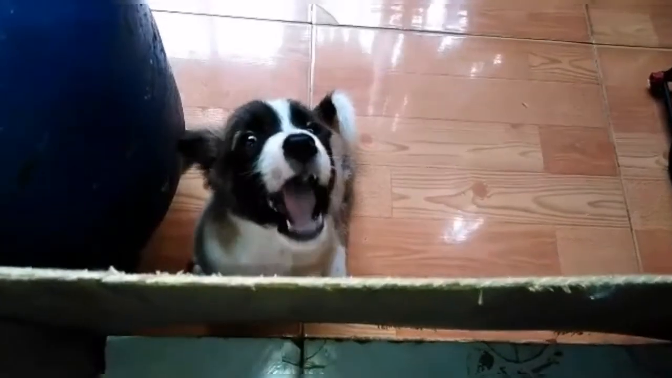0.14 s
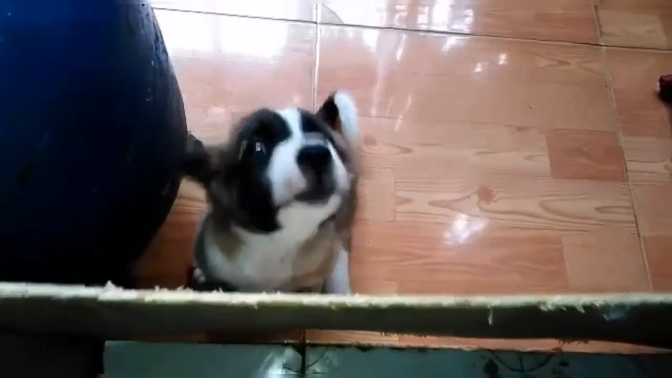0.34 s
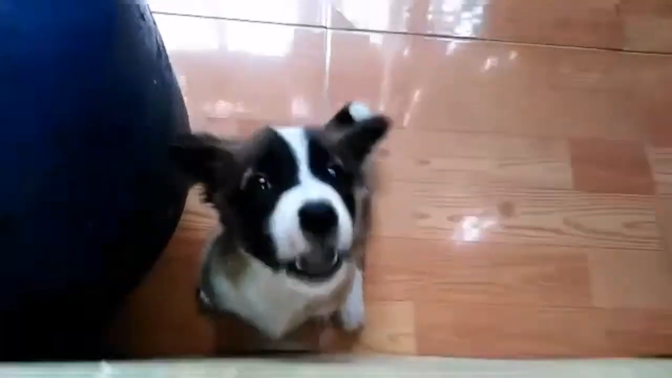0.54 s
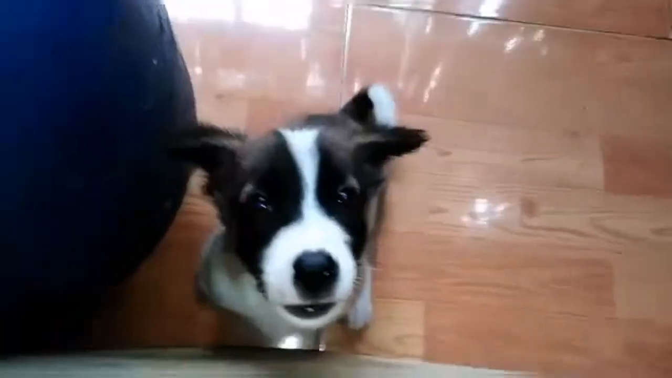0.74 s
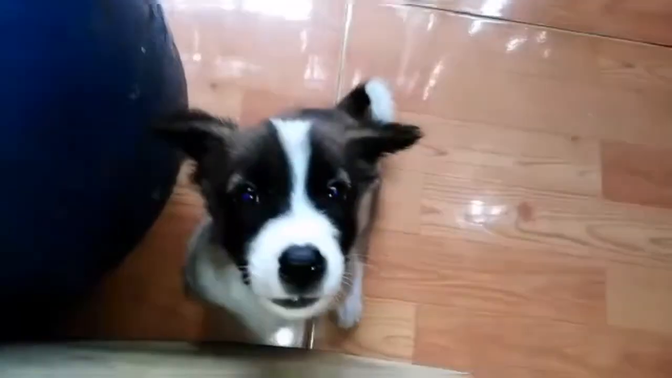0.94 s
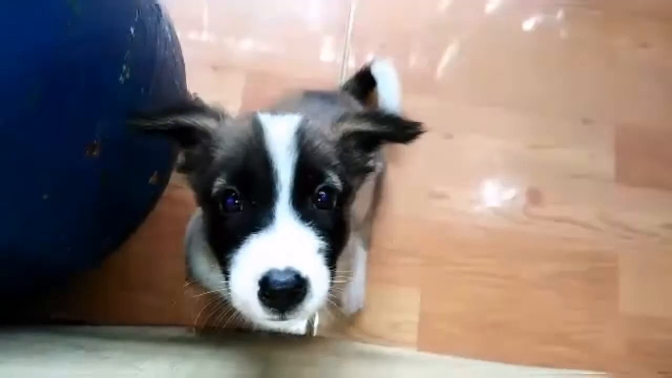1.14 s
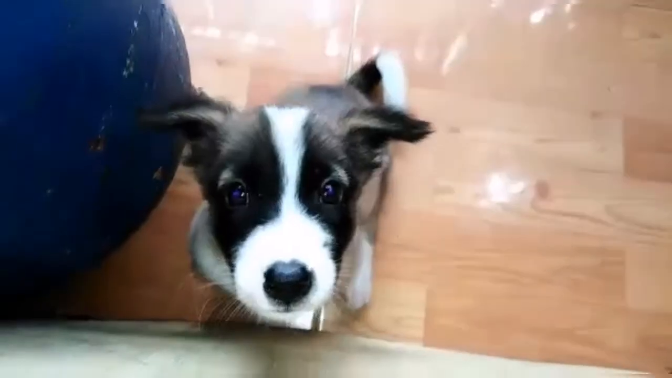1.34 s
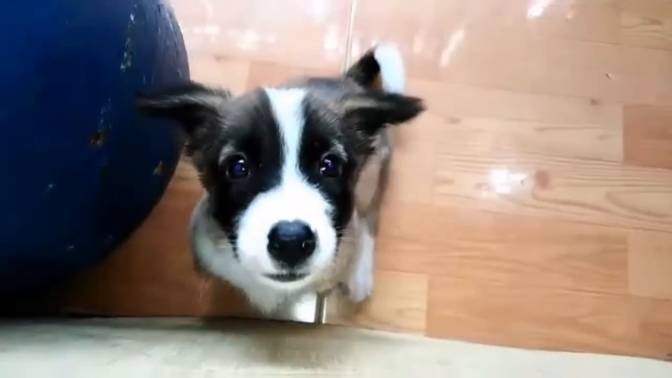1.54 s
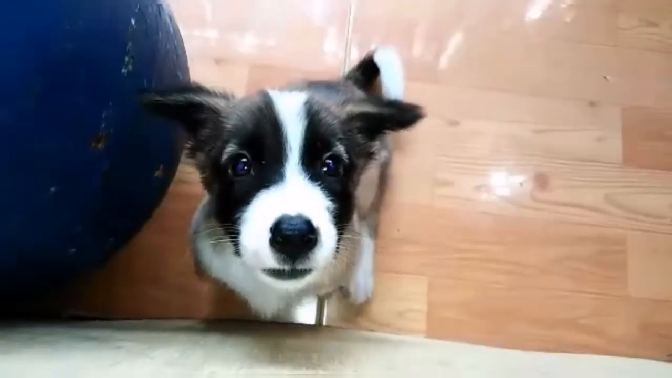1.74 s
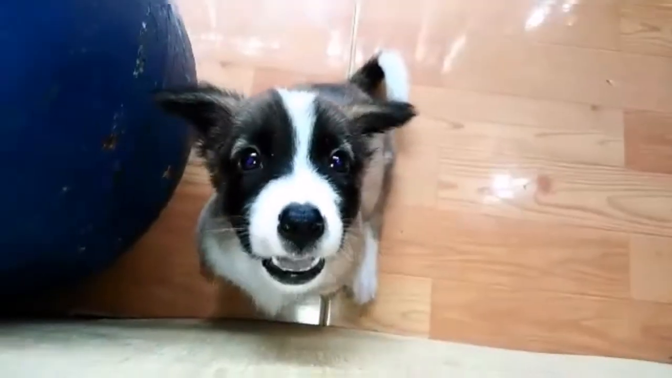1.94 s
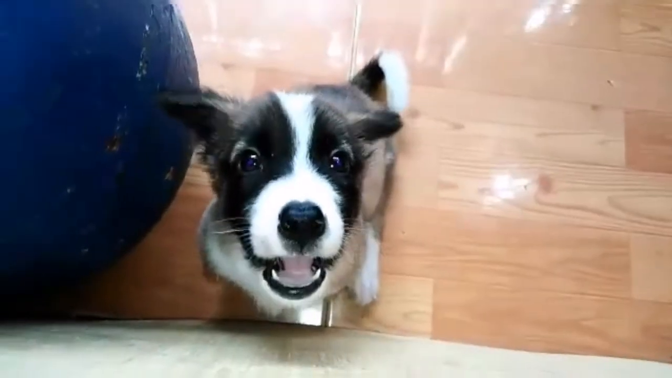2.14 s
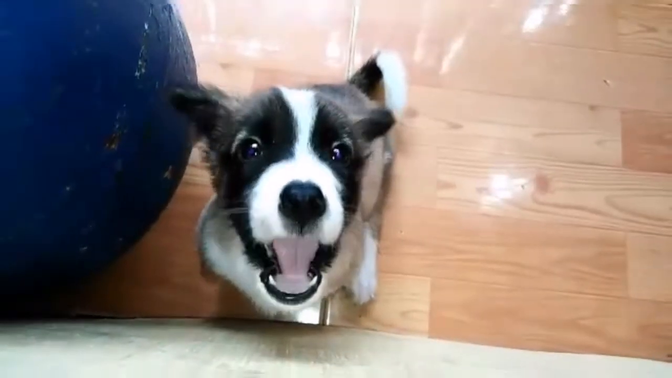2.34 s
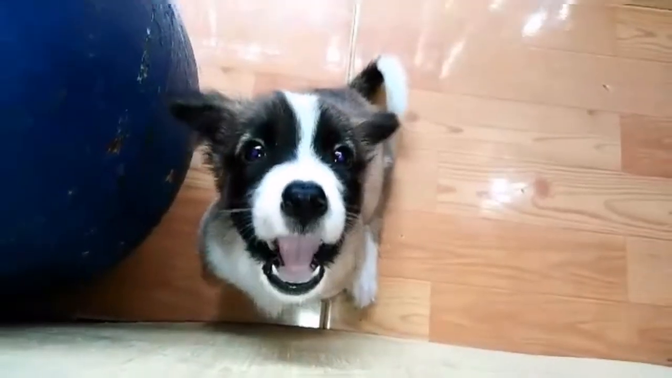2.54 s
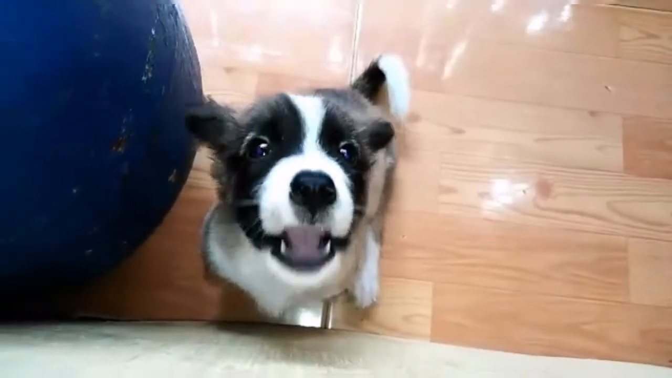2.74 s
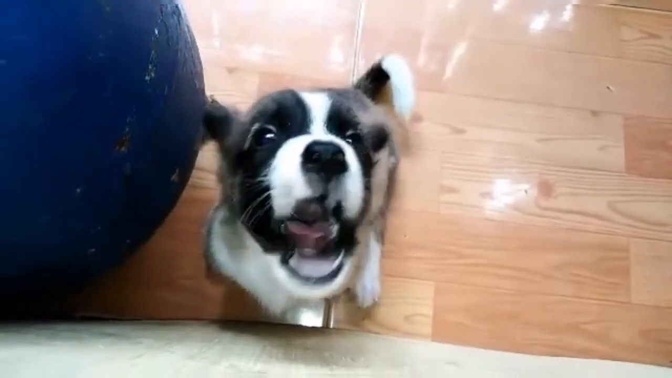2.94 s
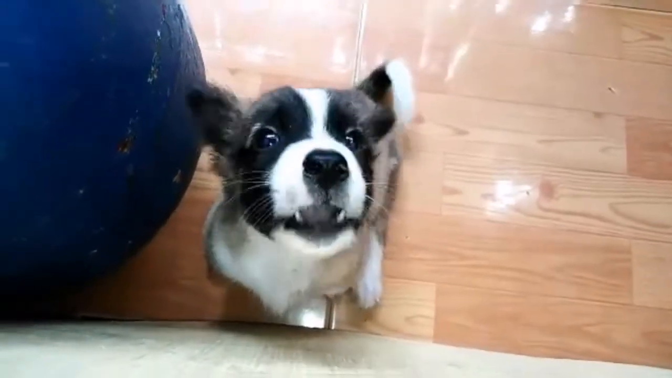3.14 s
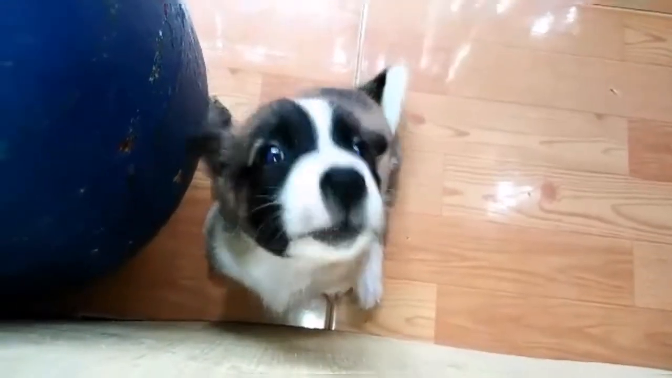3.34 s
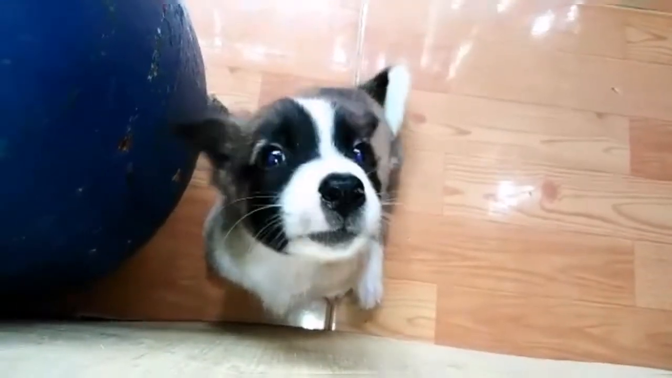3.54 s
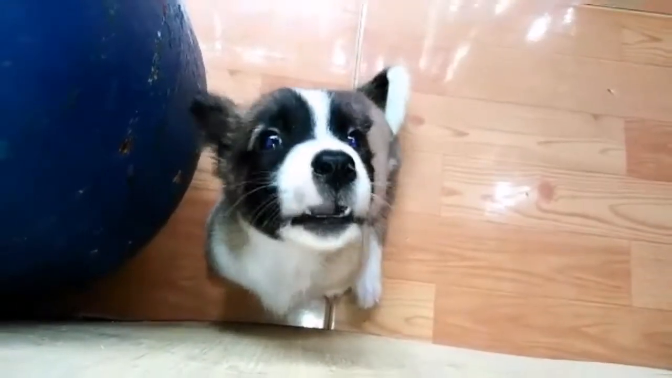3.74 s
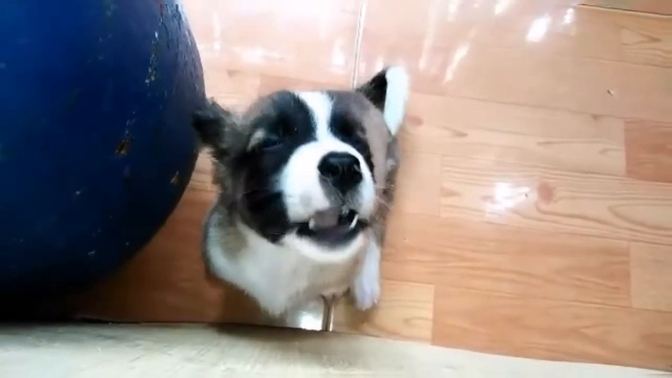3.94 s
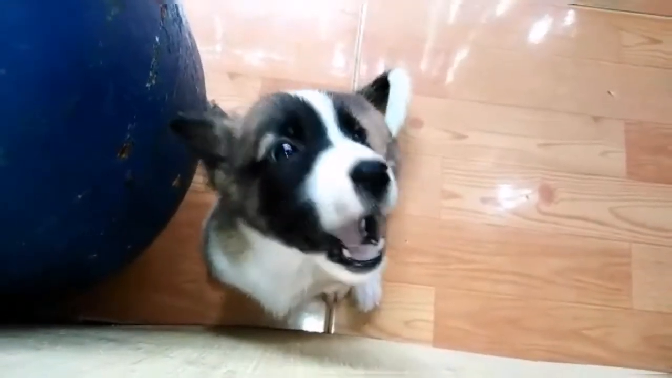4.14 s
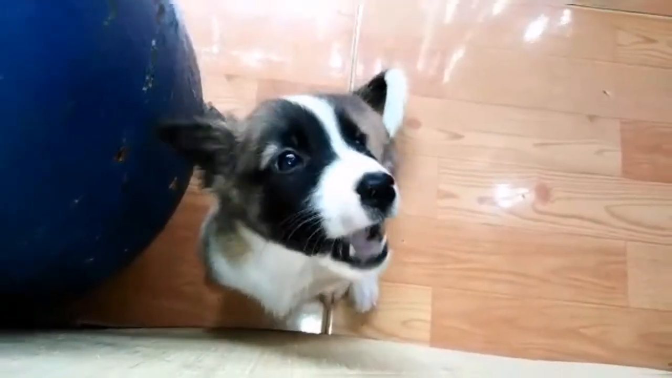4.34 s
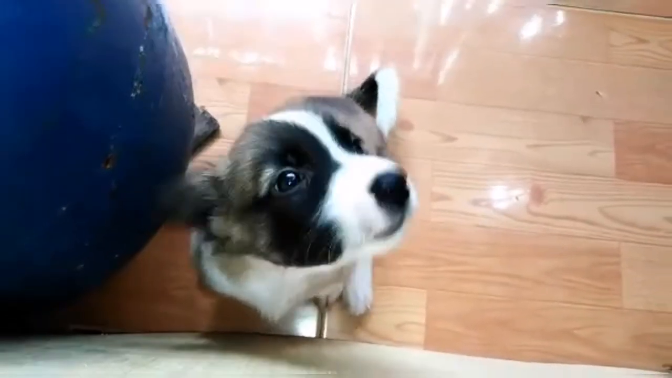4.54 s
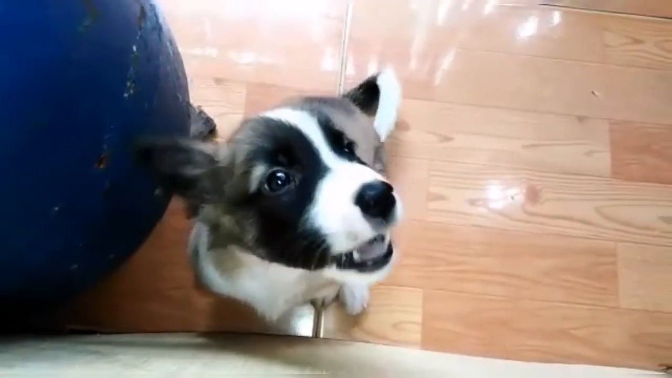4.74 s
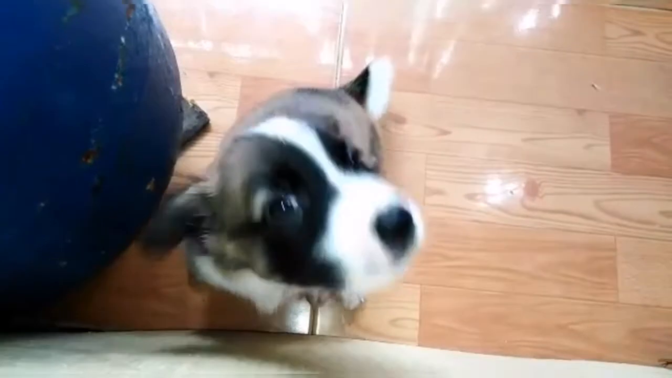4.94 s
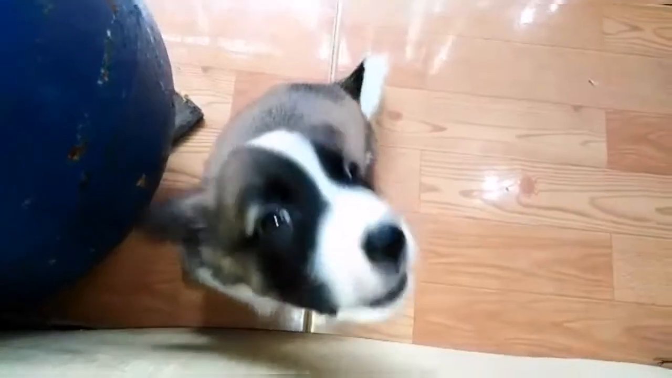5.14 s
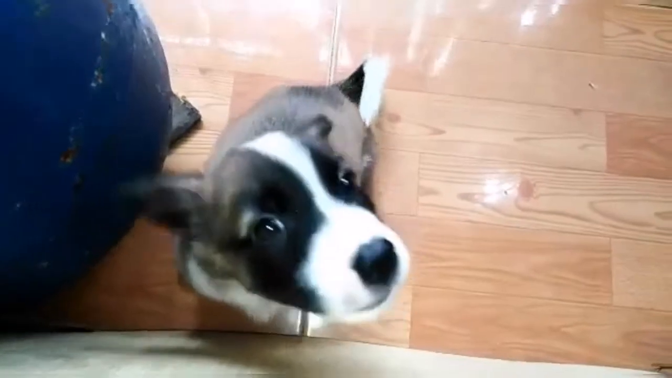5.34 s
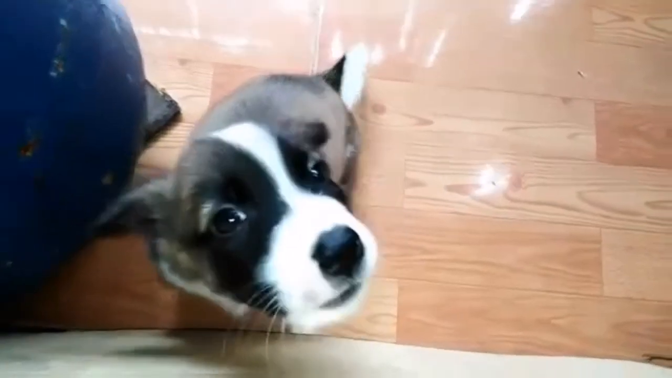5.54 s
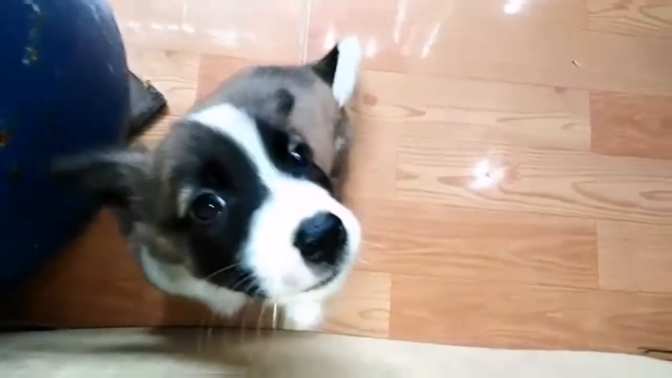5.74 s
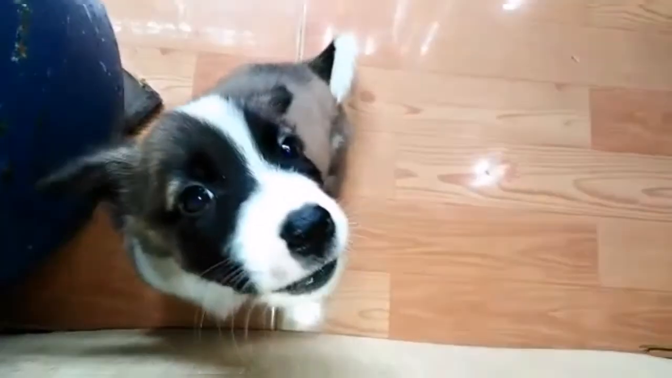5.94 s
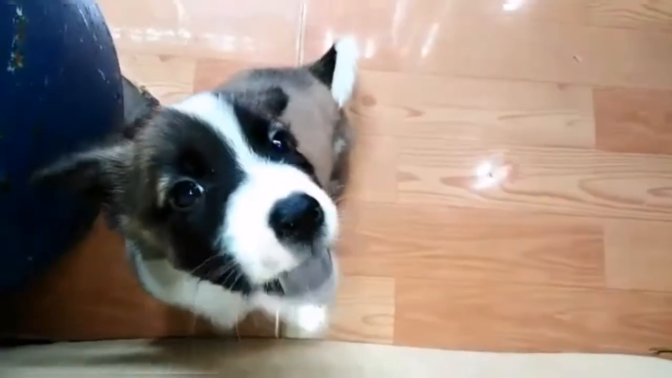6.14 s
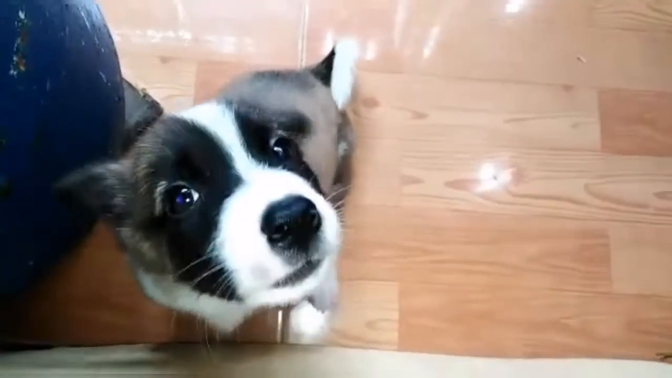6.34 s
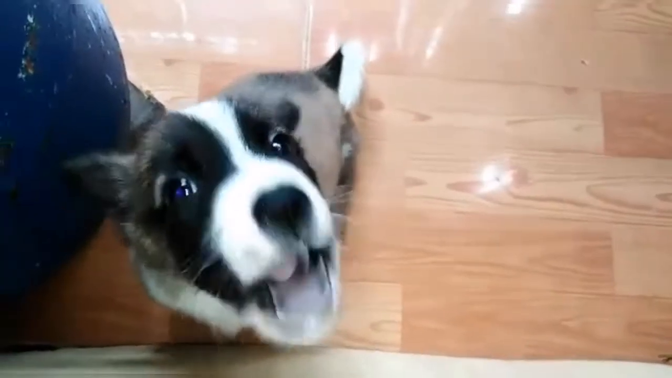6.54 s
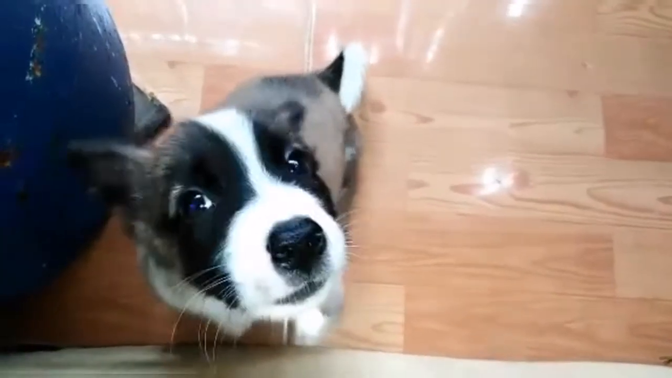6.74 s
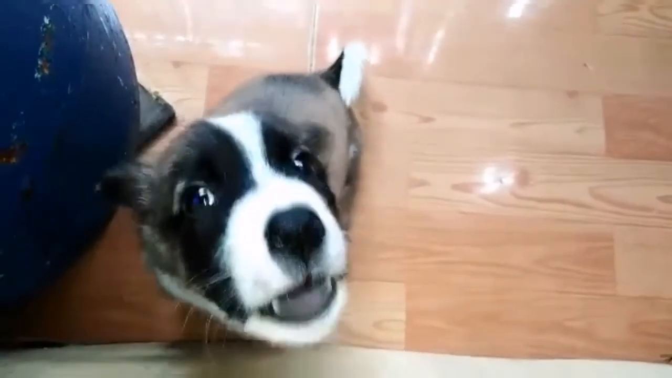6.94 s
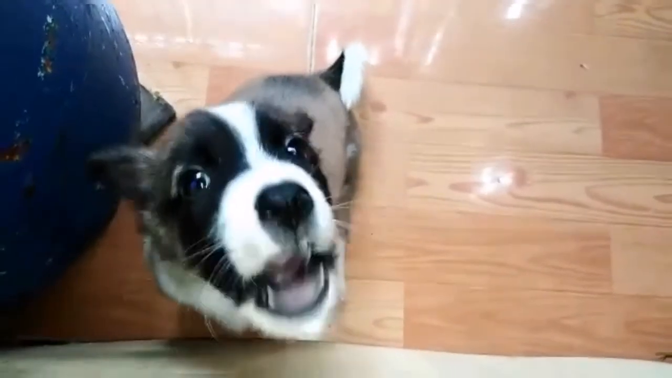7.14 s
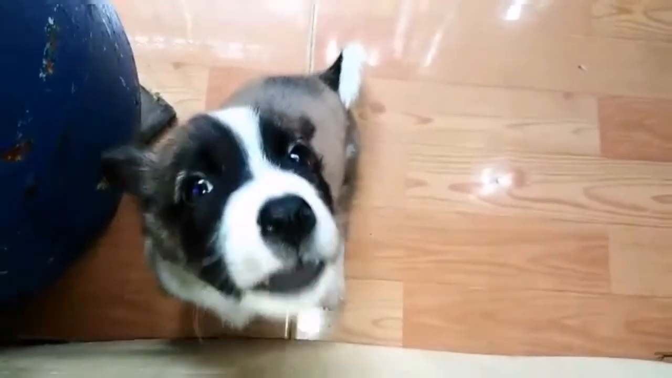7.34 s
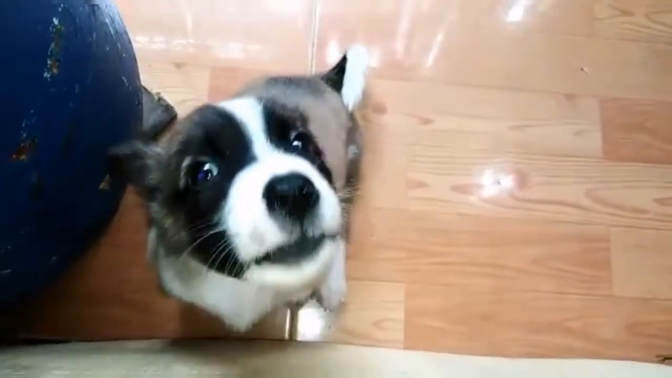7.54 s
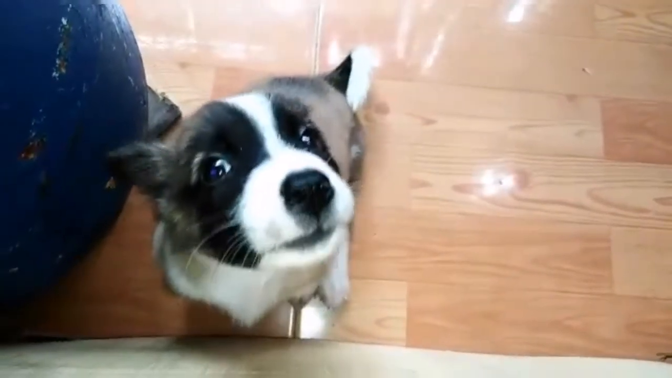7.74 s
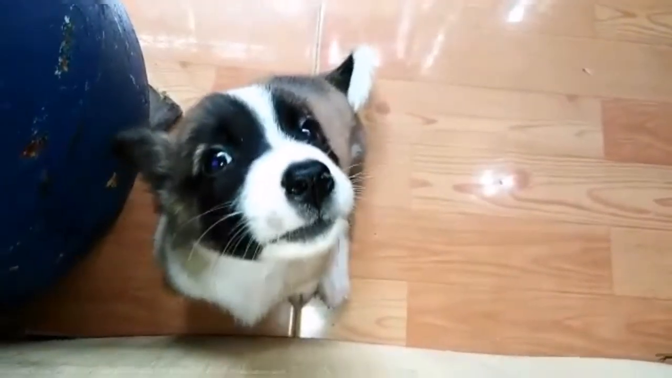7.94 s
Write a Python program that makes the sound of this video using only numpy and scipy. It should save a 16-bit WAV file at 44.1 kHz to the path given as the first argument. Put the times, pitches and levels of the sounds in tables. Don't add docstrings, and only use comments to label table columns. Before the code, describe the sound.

Low room rumble with a faint motor hum; the tail of a yelp is cut off at the very start. At 0.1 s a puppy gives a loud, high, raspy bark close to the microphone, then a squeaky short yelp at 0.5 s. Around 0.6-0.8 s dull bumps on low boards mix with a short metallic gate rattle. From 0.9 to 1.7 s there is a lull: rumble, light taps at 1.2-1.5 s, a tiny thin squeak. Small yelps at 1.75 and 2.0 s grow louder at 2.25 and 2.5 s, leading to full barks at 2.85 and 3.2 s. A weak yelp and bump come at 3.6 s, then sharp barks roughly every 0.35 s from 3.8 to 7.2 s, with a slightly longer gap near 5.8 s. Two shorter yelps close at 7.6 and 7.9 s. Short tiled-room echo, overloaded peaks, rumble ducking under barks.

```python
import sys
import numpy as np
from scipy import signal
from scipy.fft import rfft, irfft, next_fast_len
from scipy.io import wavfile
from scipy.ndimage import uniform_filter1d

SR = 44100
rng = np.random.default_rng(int(sys.argv[2]) if len(sys.argv) > 2 else 0)


def inscribe(sig):
    pcm = np.round(np.clip(np.atleast_2d(sig).T, -1, 1) * 32767)
    wavfile.write(sys.argv[1], SR, pcm.astype(np.int16))


def makeup_ratio(level_db):
    decades = np.asarray(level_db, float) / 20
    return 10 ** decades


N = 352789

# f/Hz, level/dB per Hz
ROOM_TONE = [(18, -48), (30, 5.5), (137, 0), (428, -21.5), (568, -14.5), (858, -23), (1510, -26.5),
             (1680, -22.5), (5490, -25.5), (8970, -27), (14300, -37)]
# f/Hz, level/dB
MOTOR_HUM = [(61, -46.5), (125, -47.5)]
# t/s, level/dB
RUMBLE_SWELL = [(0, -46.5), (.8, -39), (1.7, -46.5), (2.7, -35.5), (3.6, -40.5), (4.5, -41.5), (5.5, -44),
                (6.3, -44), (7.1, -34), (8, -50.5)]
# f/Hz, level/dB
MOUTH = [(250, -5), (500, -1), (900, -12), (1400, 10.5), (2100, -1), (2600, -7), (3300, 8.5), (4300, -6),
         (5500, -7.5), (6300, -24.5), (8000, -28)]
# start t/s, peak level/dB, opening f/Hz, crest f/Hz, closing f/Hz
YELP_EVENTS = [(-.06, -29.5, 858, 856, 740), (0.535, -17, 752, 764.5, 720),
               (1.742, -18.5, 637, 672.5, 661.3), (1.985, -18, 602, 792, 750),
               (2.267, -9.5, 804, 891, 798.4), (2.532, -6.5, 708.5, 916, 787),
               (2.665, -15, 1012, 1001, 797), (3.613, -23, 598, 639, 587), (5.845, -20, 609, 674, 678),
               (7.594, -18, 720, 764.5, 572), (7.91, -17, 758, 806, 654)]
# crest t/s, end t/s, period doubling/0-1, chaos/0-1, jaw gape/factor
YELP_TIMING = [(0.026, .1, .2, 1, 1.15), (0.048, 0.084, 0.2, 0.23, 1.15), (.014, .068, .05, .03, 1.04),
               (.045, .125, .05, .03, 1.21), (.032, .13, .02, .03, 1.38), (.05, .13, .55, .1, 1.24),
               (0.0069, .045, .1, 0.2, 1.73), (0.043, 0.039, 0.44, 0.94, 1.04),
               (0.0217, 0.056, 0.36, 0.5, 1), (.026, .11, 0.3, 0.34, 1.11), (0.0355, .1, 0.08, 0.18, 0.9)]
# brightness offset/dB per octave, upper mouth resonance/factor,
# level offset of the fall/dB, share of the pitch drop made early/0-1
YELP_COLOUR = [(1.5, 1.03, -13, 0.408), (-2.5, 1.274, -6, 0.435), (-5.5, 1.05, 13, 0.47),
               (0.0, 1.023, 1, 0.85), (-3, 1.22, -9, 0.64), (1, 1.073, -1, .7), (1.5, 1.0, 12, 0.388),
               (-6.5, 1.084, 2, .4), (-20, 1.04, 13, 0.37), (0.0, 1.2, 11, 0.63), (-3, 1.03, 14, 0.056)]
# level from peak/dB, share of doubling/0-1, added chaos/0-1, brightness/dB per octave
YELP_STEPS = [
    (-2, 0.9, 0.71, -5.5),
    (-1, 0.65, 0.14, 6),
    (1.5, 1.0, 0.0, 4),
    (1.5, 0, 0.0, 9),
    (-8, 0, 0.56, 12),
]
# start t/s, peak level/dB, crest f/Hz, closing f/Hz, jaw gape/factor
BARK_EVENTS = [(0.103, -5, 960, 612, 1.03), (2.855, -5, 941, 581.5, 0.92), (3.23, -5.5, 932.7, 562, 0.98),
               (3.835, -8.5, 805, 606, 0.98), (4.124, -7, 847, 647, 1.06), (4.4, -6, 968.4, 590, 0.92),
               (4.742, -5, 960, 570, 0.93), (5.075, -6.5, 976, 563, 0.92), (5.45, -5.5, 955, 524, 0.9),
               (6.126, -4, 952, 589, 0.93), (6.48, -4, 958.5, 552, 0.93), (6.853, -3.5, 926, 497, 0.93),
               (7.209, -5.5, 895.6, 628, 0.93)]
# folds lock t/s, doubling clears t/s, pitch sags t/s, end t/s,
# period doubling/0-1
BARK_TIMING = [(.08, 0.082, .12, .21, 0.18), (0.045, 0.096, .105, .205, 0.65),
               (.055, 0.11, .105, .172, 0.57), (0.05, .055, 0.073, .14, 0.16),
               (0.049, 0.0568, .07, 0.16, 0.74), (.042, .078, .115, .21, 0.54),
               (0.033, 0.085, .1, .2, 0.85), (0.061, .1, .108, .192, 0.5), (.055, 0.081, .095, .175, 0.59),
               (0.049, 0.078, .095, .175, 0.5), (.045, 0.091, .112, .175, 0.58),
               (0.07, .097, .107, .17, 0.72), (0.0534, .078, .085, .17, 0.6)]
# opening pitch/share of crest, chaos of the rise/factor, chaos added in the fall/0-1,
# brightness offset/dB per octave, level offset of the fall/dB
BARK_COLOUR = [(.8, .75, -.05, 0.0, 3), (.85, 1.0, .1, 2.5, -1), (.75, 1.3, .25, 0.0, -2),
               (.72, .7, .2, 1.5, 2.5), (.68, .5, .55, 3, -3), (.81, 1.0, .1, 1.5, -1),
               (.93, 1.3, .25, 0.0, -1), (.75, .75, .2, -3.5, -1), (.69, .7, .3, -3, -1),
               (.85, .8, .2, -1.5, -2), (.81, .9, .2, -1.5, -1), (.78, .75, .2, -1.5, 1.5),
               (.77, .65, .4, -1.5, 0.0)]
# level from peak/dB, share of doubling/0-1, chaos/0-1, brightness/dB per octave
BARK_STEPS = [
    (-15.5, 1, 1, -10),
    (-10.5, 0.99, 0.44, 2),
    (-1.5, 1.04, 0.45, 1.5),
    (1, 1.0, .08, 2),
    (-0.5, 0.91, 0.3, 2.5),
    (-5, 0.0, 0.42, -2.5),
    (-4.5, 0.0, 0, -2.5),
    (-7, 0.18, 0.13, 9),
    (-14.5, 0.01, 0.0, 9.5),
    (-19.5, 0.26, 0, -39),
]
BARK_RESONANCE = (1.064, 0.98, 0.878, 1.088)
# start t/s, length t/s, level/dB, first f/Hz,
# last f/Hz
SQUEAK_EVENTS = [(3.223, 0.013, -31, 560, 635), (3.586, 0.025, -33.5, 565, 610),
                 (5.442, 0.011, -34, 560, 640), (5.828, 0.022, -41.5, 573, 620),
                 (6.843, .008, -32, 604, 690), (0.13, 0.051, -9, 829, 830), (2.862, 0.015, -12.5, 821, 870),
                 (4.408, 0.0425, -10.5, 880, 823), (0.507, 0.026, -15, 907, 1088),
                 (1.449, .018, -31, 1060, 1100), (1.473, 0.0288, -30, 1154, 1343),
                 (1.73, 0.011, -21, 490, 616), (2.252, 0.007, -14, 1054, 996), (5.89, 0.011, -16, 828, 872),
                 (7.573, 0.022, -14.5, 888, 1065), (7.894, 0.017, -15, 816, 1030)]
# f/Hz, time to fall 60 dB t/s
ECHO_TIME = [(200, 0.32), (1500, 0.31), (4000, 0.29), (10000, 0.15)]
# start t/s, level/dB, hold t/s, dying/dB per s
RATTLE_EVENTS = [
    (0.332, -45.5, .015, 138),
    (0.664, -28.5, 0.11, 240),
    (1.208, -55.5, .1, 138),
    (1.48, -49, 0.033, 403),
    (7.073, -40.5, .012, 163),
]
# f/Hz, level/dB, time to fall 60 dB t/s
GATE_BARS = [(694, -9.5, 0.64), (2290, 0.5, 0.17), (2550, -25, 0.22), (3165, 15, 0.029), (4400, 4, 0.052),
             (4250, -20, 0.91), (5950, -0.5, 0.1), (8200, 0, 0.073), (11400, -36, 0.25)]
# f/Hz, level/dB per Hz
SCUFF_NOISE = [(180, -50), (300, -3.5), (407, -5.5), (1500, -9), (3090, -4.5), (3750, -6), (4400, -13.5),
               (4840, -7.5), (14000, -18)]
# t/s, peak level/dB
BUMP_EVENTS = [
    (0.592, -20.5),
    (0.744, -18),
    (0.801, -13.5),
    (1.205, -29),
    (1.242, -25.5),
    (1.298, -31),
    (1.441, -28.5),
    (1.498, -26.5),
    (1.8, -24),
    (3.619, -21),
]
# f/Hz, level/dB, time to fall 60 dB t/s
BOARD_MODES = [(62, -18, 0.12), (137, 6, 0.21), (210, 4, 0.24), (251, 5, 0.11), (427, 2.5, 0.16)]


def rms_one(x):
    return x / np.sqrt(np.mean(np.abs(x) ** 2) + 1e-20)


def at_hz(points, hz):
    p = np.array(points)
    return np.interp(np.log(hz), np.log(p[:, 0]), p[:, 1])


def drift(rate_hz, size):
    r = np.exp(-2 * np.pi * rate_hz / SR)
    skip = int(SR / rate_hz)
    white = rng.standard_normal(size + skip)
    return rms_one(signal.lfilter([1], [1, -2 * r, r * r], white)[skip:])


def coloured(spectrum):
    size = next_fast_len(N)
    hz = np.maximum(np.arange(size // 2 + 1) * SR / size, 1)
    shaped = rfft(rng.standard_normal(size)) * makeup_ratio(at_hz(spectrum, hz))
    return rms_one(irfft(shaped, size)[:N])


def ring(clicks, hz, t60):
    r, w = makeup_ratio(-60 / (t60 * SR)), 2 * np.pi * hz / SR
    return signal.lfilter([0, np.sin(w)], [1, -2 * r * np.cos(w), r * r], clicks + 1e-18)


def air():
    t = np.arange(N) / SR
    hum = 0
    for hz, db in MOTOR_HUM:
        loudness = makeup_ratio(db + 4.9 * drift(5.7, N))
        hum = hum + loudness * np.sin(2 * np.pi * hz * t + 0.53 * drift(2.73, N))
    steady = makeup_ratio(-42.5) * coloured(ROOM_TONE) + hum
    lows = signal.sosfilt(signal.butter(2, 200, fs=SR, output="sos"), steady)
    swell_db = np.interp(t, *np.transpose(RUMBLE_SWELL)) + 40
    swell = makeup_ratio(swell_db + 0.6 * drift(9.1, N))
    return steady + (swell - 1) * lows


def yelp_controls(yelp, course, tone):
    start, peak_db, open_hz, crest_hz, shut_hz = yelp
    crest, end, doubling, unrest, gape = course
    tilt_db, reach, fall_db, early = tone
    settle = .36
    s = start + np.array([0, crest / 2, crest, crest + settle * (end - crest), end])
    pitch_step = np.array([open_hz - crest_hz] * 3 + [shut_hz - crest_hz] * 2)
    hz = crest_hz + pitch_step * [1, 1 - .75, 0, early, 1]
    db, share, more_chaos, bright = np.transpose(YELP_STEPS)
    db = peak_db + db + fall_db * np.array([0.14, 0, 0, 0, 0.21])
    chaos = np.maximum(unrest + more_chaos, 0)
    return np.transpose([s, hz, db, doubling * share, chaos, bright + tilt_db, reach + 0 * s]), gape


def bark_controls(bark, course, voice):
    start, peak_db, crest_hz, shut_hz, gape = bark
    lock, clear, sag, end, doubling = course
    opening, rise_chaos, fall_chaos, tilt_db, fall_db = voice
    switch_s, mid_rise = 0.0075, .7
    fall_time = np.array([0, .35, .7, 1])
    fall_depth = np.array([0, .22, .74, 1])
    s = [0, min(lock / 2, .024), lock - switch_s, lock, clear, clear + switch_s,
         *(sag + (end - sag) * fall_time)]
    below_crest = (1 - opening) * np.array([1, 1 - mid_rise, .06, 0, 0, 0])
    hz = [*crest_hz * (1 - below_crest), *crest_hz + (shut_hz - crest_hz) * fall_depth]
    db, share, chaos, bright = np.transpose(BARK_STEPS)
    rising, falling = np.arange(10) < 3, np.arange(10) > 6
    db = peak_db + db + fall_db * falling
    chaos = np.where(rising, rise_chaos * chaos, chaos + fall_chaos * falling)
    reach = np.repeat(BARK_RESONANCE, (3, 2, 2, 3))
    s = start + np.maximum.accumulate(s)
    return np.transpose([s, hz, db, doubling * share, chaos, bright + tilt_db, reach]), gape


def squeak_controls(start, length, level_db, first_hz, last_hz):
    swell_db, gape = 9.5, 1.036
    voice = (0, .04, -10.5, 1.054)   # doubling, chaos, brightness in dB per octave, mouth resonance
    return [(start, first_hz, level_db - swell_db, *voice),
            (start + length, last_hz, level_db, *voice)], gape


def yap(rows, gape):
    effort_db, smear_hz, jitter, chaos_db = -0.5, 176.0, 0.005, -2.5
    s, *columns = np.transpose(rows)
    t = np.arange(s[0] + .001, s[-1] + .01, 1 / SR)
    pitch, level_db, doubling, unrest, bright, reach = [np.interp(t, s, c) for c in columns]
    doubling = np.clip(doubling, 0, 1)
    pitch = uniform_filter1d(pitch, size=350)
    crest = np.argmax(pitch * (t >= s[min(2, len(s) - 1)]))
    closing = (1 - pitch / pitch[crest]) * (t > t[crest])
    phase = np.pi * np.cumsum(pitch * (1 + jitter * drift(58.2, len(t)))) / SR
    sound, power = 0, 1e-12
    for k in range(1, 31):
        hz = k * pitch / 2
        gape_shift = gape ** np.clip(np.log2(2600 / hz), 0, 1)
        reach_shift = reach ** np.clip(2 * np.log2(hz / 1900), 0, 1)
        seen_hz = hz * (1 + 1.05 * closing) / gape_shift / reach_shift
        tilt_db = bright * np.maximum(np.log2(hz / 1400), -.25)
        muffled_db = 75 * closing * np.maximum(np.log2(hz / 1500), 0)
        throat_db = 40 * closing * np.exp(-(np.log2(hz / 630) / .35) ** 2) - 6 * (k == 1)
        mouth_db = at_hz(MOUTH, seen_hz) + tilt_db - muffled_db + throat_db
        gain = makeup_ratio(mouth_db + 2.0 * drift(21.7, len(t)))
        chaos = np.clip(unrest * (hz / 1700) ** .6 + hz / 40000, 0, 1) ** 2
        beat_share = doubling if k % 2 else 1 - 0.95 * doubling
        clear = gain * np.sqrt(1 - chaos) * beat_share
        smeared = gain * np.sqrt(chaos) * makeup_ratio(chaos_db)
        wobble = (drift(smear_hz, len(t)) + 1j * drift(smear_hz, len(t))) / np.sqrt(2)
        sound = sound + np.real((clear + smeared * wobble) * np.exp(1j * (k * phase + k * k)))
        power = power + (clear ** 2 + smeared ** 2) / 2
    edges = np.clip(np.minimum((t - t[0]) / .003, (t[-1] - t) / .015), 0, 1)
    loudness = makeup_ratio(level_db + effort_db + 4.7 * closing)
    return round(t[0] * SR), sound / np.sqrt(power) * loudness * edges


def puppy():
    out = np.zeros(N + SR)
    calls = [*map(yelp_controls, YELP_EVENTS, YELP_TIMING, YELP_COLOUR),
             *map(bark_controls, BARK_EVENTS, BARK_TIMING, BARK_COLOUR),
             *(squeak_controls(*row) for row in SQUEAK_EVENTS)]
    for rows, gape in calls:
        at, sound = yap(rows, gape)
        out[max(at, 0):at + len(sound)] += sound[max(-at, 0):]
    return out[:N]


def room(x):
    t, tail = np.arange(SR // 2 + SR // 4) / SR, 0
    white = rng.standard_normal(len(t))
    edges = 100 * 2. ** np.arange(8)
    for low, high in zip(edges, edges[1:]):
        band = signal.sosfilt(signal.butter(2, [low, high], "band", fs=SR, output="sos"), white)
        tail = tail + band * makeup_ratio(-60 * t / at_hz(ECHO_TIME, np.sqrt(low * high)))
    tail = signal.sosfilt(signal.butter(1, 2100, "high", fs=SR, output="sos"), tail)
    tail = tail * np.clip((t - .006) / 0.0022, 0, 1)
    return signal.fftconvolve(x, tail / np.sqrt(np.sum(tail ** 2)))[:N]


def gate():
    t, level = np.arange(N) / SR, 0
    rise_db_per_s = 1400
    for start, db, hold, dying in RATTLE_EVENTS:
        before = np.maximum(start - t, 0)
        after = np.maximum(t - start - hold, 0)
        level = level + makeup_ratio(db - rise_db_per_s * before - dying * after)
    level = uniform_filter1d(level, size=300)
    happens = rng.random(N) < 900 / SR
    clicks = happens * makeup_ratio(0.96 * rng.exponential(1, N)) * rng.choice([-1, 1], N)
    contact = rms_one(clicks) * level
    bars = sum(makeup_ratio(db - 29.0) * ring(contact, hz, t60) for hz, db, t60 in GATE_BARS)
    scuff = makeup_ratio(4.5) * level * coloured(SCUFF_NOISE) * makeup_ratio(3.5 * drift(31, N))
    return bars + scuff


def bumps():
    table, out = np.array(BUMP_EVENTS), 0
    luck_db = rng.normal(0, 2.5, (len(table), len(BOARD_MODES)))
    for k, (hz, db, t60) in enumerate(BOARD_MODES):
        clicks = np.zeros(N)
        clicks[(table[:, 0] * SR).astype(int)] = makeup_ratio(table[:, 1] + db - 18.5 + luck_db[:, k])
        out = out + ring(clicks, hz, t60)
    return signal.sosfilt(signal.butter(2, 900, fs=SR, output="sos"), out)


def scene():
    near = puppy() + gate()
    mono = air() + near + makeup_ratio(-4.5) * room(near) + bumps()
    return np.array([mono, mono])


def low_pass(x):
    return signal.sosfilt(signal.butter(12, 14420, fs=SR, output="sos"), x)


def record(dry):
    dry = signal.sosfilt(signal.butter(6, 44, "high", fs=SR, output="sos"), dry)
    fall_db = 90 * np.arange(N) / SR
    level_db = 10 * np.log10(uniform_filter1d(dry[0] ** 2, size=200) + 1e-12)
    held_db = np.maximum.accumulate(level_db + fall_db) - fall_db
    cut_db = -.45 * np.maximum(held_db + 32, 0)
    r = np.exp(-1 / (.012 * SR))
    gained = dry * makeup_ratio(6.0 + signal.lfilter([1 - r], [1, -r], cut_db))
    top, hard = .31, 4.0
    clipped = gained / (1 + np.abs(gained / top) ** hard) ** (1 / hard)
    treble_limit = signal.cheby2(12, 70, 14900, fs=SR, output="sos")
    mix = signal.sosfilt(treble_limit, clipped)
    return low_pass(mix)


dry = scene()
out = record(dry)
inscribe(out)
```